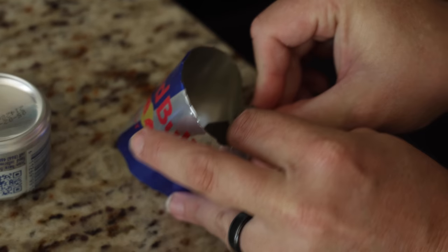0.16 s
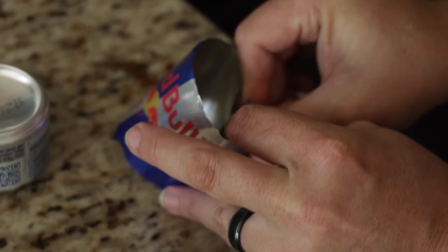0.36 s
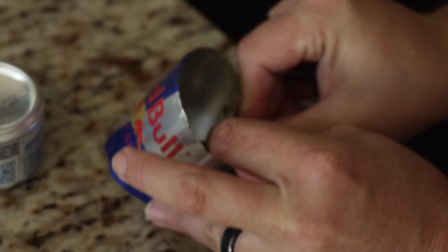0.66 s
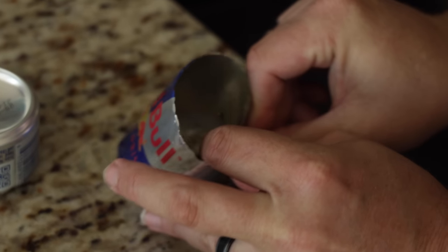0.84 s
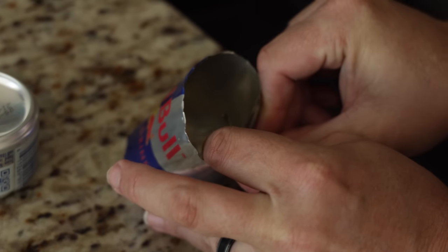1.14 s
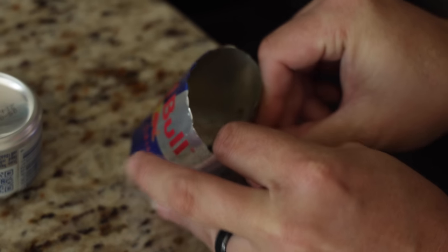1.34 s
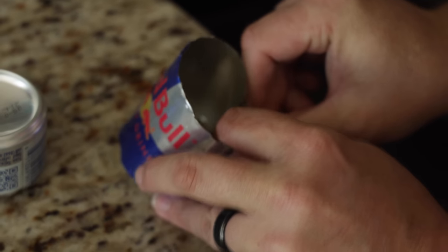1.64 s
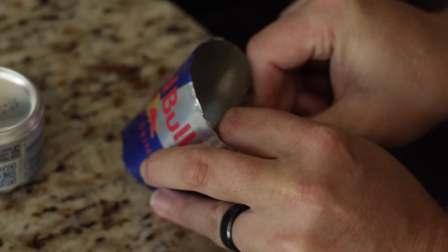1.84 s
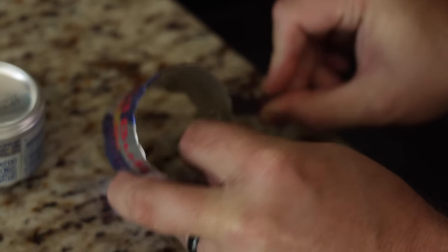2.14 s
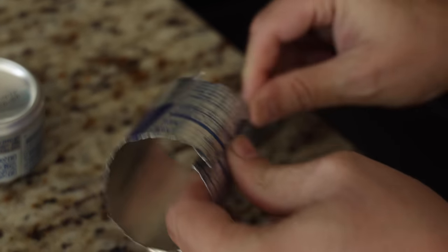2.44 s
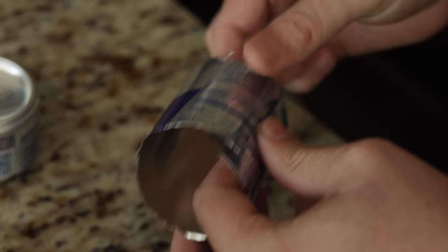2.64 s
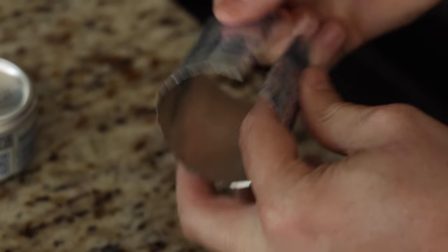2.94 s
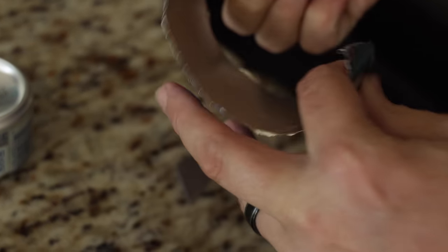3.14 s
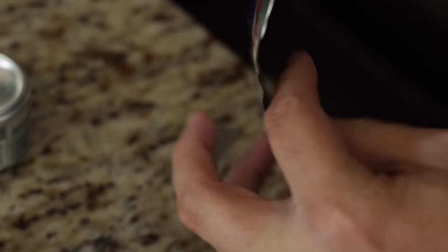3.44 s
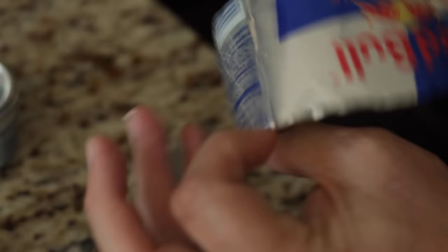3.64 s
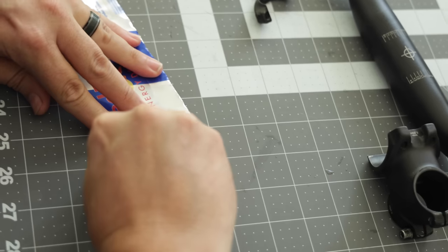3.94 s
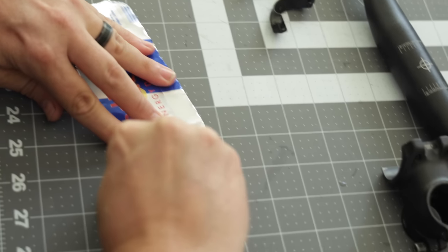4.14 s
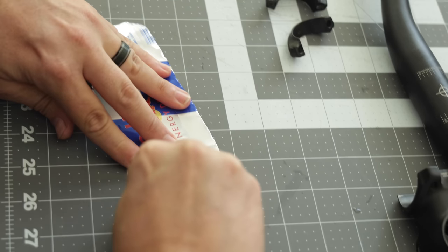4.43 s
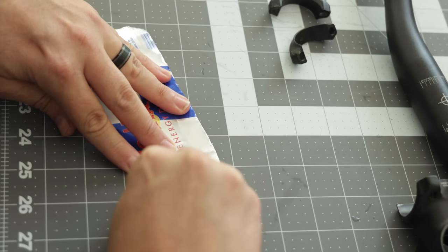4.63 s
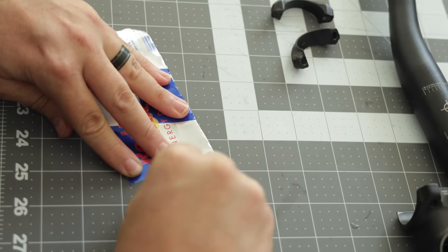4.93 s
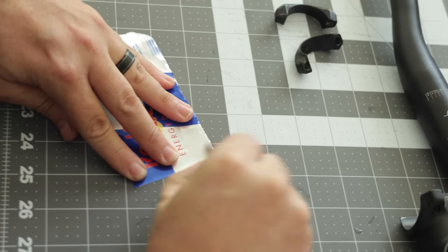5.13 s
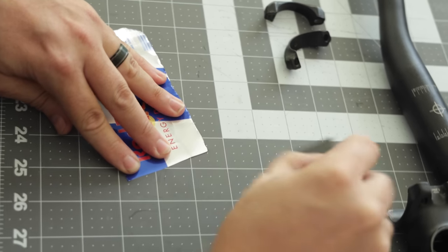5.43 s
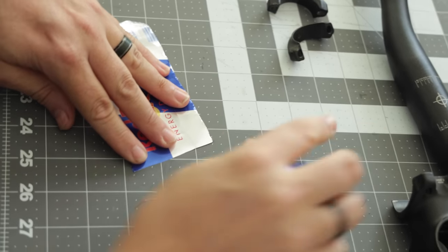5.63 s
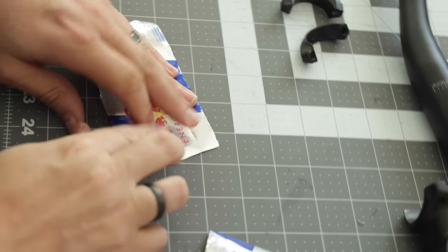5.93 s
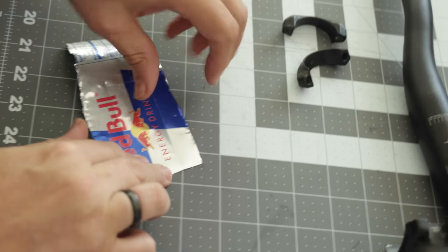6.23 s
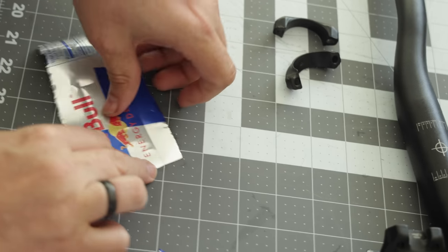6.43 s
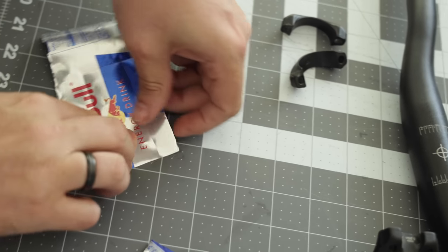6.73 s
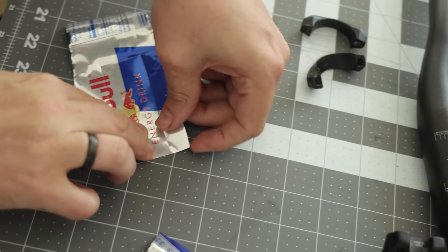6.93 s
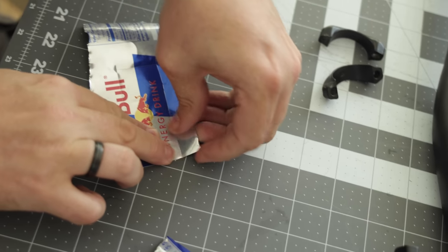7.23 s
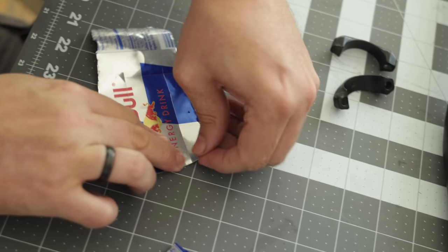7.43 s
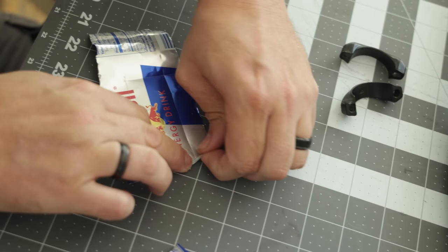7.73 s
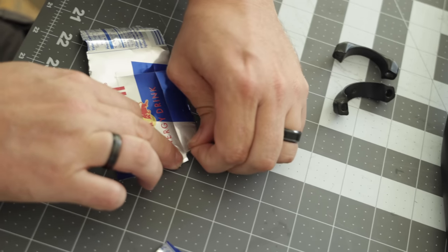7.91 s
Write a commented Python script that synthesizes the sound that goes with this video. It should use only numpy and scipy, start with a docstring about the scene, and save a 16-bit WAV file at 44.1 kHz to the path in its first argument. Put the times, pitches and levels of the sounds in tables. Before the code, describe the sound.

Close metallic snaps and gritty tearing of a drink can, a brief high squeal, then sharp clicks, a singing strip and crinkly pops in a quiet workshop.

```python
"""A razor blade slits a thin aluminium can on a stone counter, over a mains hum: small jerks and
larger snaps set the wall ringing, and the blade squeals on its own resonances as it slides free.
Then, over the softer air noise of a workshop, the flattened sheet is scored on a cutting mat with
ticks and clicks, a strip is dragged away singing and chattering, and the sheet pops and rustles under
the fingers. Hands hiss and brush, soft knocks swing the work surface, and a room tail follows."""
import sys
import numpy as np
from scipy import signal
from scipy.fft import rfft, irfft, next_fast_len
from scipy.io import wavfile

SR = 44100
rng = np.random.default_rng(int(sys.argv[2]) if len(sys.argv) > 2 else 0)


def wav_record(signal):
    """Record a signal, one row per channel, as 16-bit PCM in the file named by sys.argv[1]."""
    frames = np.transpose(np.atleast_2d(signal))
    bounded = np.clip(frames, -1, 1)
    # unit amplitude maps onto the largest positive 16-bit level
    quanta = np.round(bounded * 32767).astype(np.int16)
    wavfile.write(sys.argv[1], SR, quanta)


N = 355887
TIME = np.arange(N) / SR
WORKSHOP_START_S = 3.82
# Left minus right, in dB: the can leans slightly right, the knife on the mat slightly left
CAN_PAN_DB, KNIFE_PAN_DB = -0.4, 1.4

# Edges of the four pitch ranges of a buckle, named body, ring, crack and fizz: f/Hz
REGISTER_EDGES = [680, 1450, 3600, 7500, 15000]
# How each kind of buckle fills those ranges:
# level/dB, gain per dB of brightness/(dB/dB), side level/dB
TEAR_REGISTERS = [(-11.5, -0.4, -10.5), (1, 0, -5.5), (2, 2, -5), (-5, 3.37, -1.5)]
CLICK_REGISTERS = [(-7.5, -0.26, -7), (1.5, -0.17, -3.5), (2, 1.09, 0.5), (-4.5, 1.9, 1.5)]
POP_REGISTERS = [(-17, 0.58, -17), (0, 0.023, -7), (0.5, 1.36, -4.5), (-9.5, 1.86, -3)]

# Hum tones: f/Hz, middle rms level/dB
HUM_TONES = [(120, -42.5), (179.5, -54), (240, -47), (480, -57.5)]
# Shape of the air noise in each place: f/Hz, relative level/dB
COUNTER_AIR = [(20, -23.5), (45, -11), (75, 2.5), (130, 0.5), (260, 0.5), (420, -5.5), (800, -7.5),
               (1600, -16.5), (3500, -22.5), (8000, -45), (16000, -71.5)]
WORKSHOP_AIR = [(20, -12), (45, -11.5), (85, 2.5), (160, -0.5), (300, -1.5), (700, -9), (1500, -11),
                (3500, -33.5), (8000, -35), (16000, -70)]

# The round can snaps as the blade tears it:
# t/s, level/dB, brightness/dB, time to fall 60 dB/s, pitch of the buckling patch f/Hz
CAN_SNAPS = [(0.0215, -20.5, -3, 0.019, 3320), (0.1262, -15.5, -3.5, 0.012, 1600),
             (0.3223, -19, -4.5, 0.02, 1675), (0.7967, -14, -6, 0.045, 1580),
             (0.8095, -13, -1.5, .028, 3180), (0.871, -17.5, -1, 0.037, 3050),
             (1.1329, -21, -3.5, .024, 1770), (1.433, -23.5, -4, 0.036, 1730),
             (1.4662, -27, -4, 0.17, 1740), (1.8388, -15, -2, 0.034, 3140), (1.968, -13, -10, 0.053, 1770),
             (1.976, -12, -1.5, 0.034, 1550), (1.9945, -16, -13, 0.073, 1550),
             (2.0124, -16.5, 2, 0.023, 6000), (2.0185, -10.5, -3.5, 0.025, 2020)]
# The blade jerks forward through the can wall: t/s, level/dB
BLADE_JERKS = [(0.0675, -25.5), (0.106, -24), (0.182, -28.5), (0.2, -23.5), (0.211, -27), (0.2425, -51),
               (0.26, -28.5), (0.294, -39), (0.308, -23), (0.446, -26.5), (0.466, -30), (0.485, -28),
               (0.526, -29), (0.537, -32.5), (0.6035, -52), (0.645, -33.5), (0.7095, -28), (1.002, -25.5),
               (1.19, -30), (1.276, -31.5), (1.336, -38), (1.5765, -29), (1.629, -34.5), (1.666, -39),
               (1.756, -32), (1.9246, -41)]
# Force on the blade in the cut, heard as grinding: t/s, level/dB
BLADE_FORCE = [(0, -40.5), (.15, -38.5), (.32, -31.5), (.38, -41.5), (.77, -42), (.79, -39), (.92, -33),
               (.97, -43.5), (1.1, -36.5), (1.38, -45), (1.49, -37), (1.72, -44.5), (1.95, -38.5),
               (1.985, -19), (2.04, -30), (2.23, -37.5), (2.45, -60.5)]
# The opened can pops as the hands bend it:
# t/s, level/dB, brightness/dB, time to fall 60 dB/s, patch pitch f/Hz
CAN_POPS = [(2.8241, -20.5, -22, 0.0036, 2300), (2.8565, -19.5, -12.5, 0.018, 2080),
            (2.9313, -25, -19, 0.032, 1750), (2.955, -40.5, 1.5, 0.037, 4700),
            (3.3459, -37.5, 1.5, 0.049, 3900), (3.4741, -31.5, -0.5, .025, 4240)]
# Resonances of the can: f/Hz, width/Hz, level/dB
CAN_MODES = [(1146, 260, -5.5), (1418, 550, -2), (1720, 45, 2.5), (2123, 410, -9), (3480, 1700, -7.5),
             (4370, 370, -9.5), (5980, 130, -31)]
# Long-ringing resonances of its open shell: f/Hz, width/Hz, level/dB
SHELL_MODES = [(1330, 6, -3), (1515, 6, -8), (1463, 6, -4.5), (1740, 2.7, -0.5), (1870, 8, -2.5),
               (2010, 6, -2.5), (2070, 7.4, -6)]

# The blade squeals, faintly and then in three surges: start t/s, length/s, level/dB
SQUEALS = [(2.49, 0.11, -48), (2.552, 0.04, -16.5), (2.59, .035, -13.5), (2.626, 0.041, -17.5)]
# The blade catches on the cut edge: t/s, level/dB
CATCHES = [(2.493, -54), (2.596, -20.5), (2.614, -21.5), (2.662, -34.5)]
# Free resonances of the blade: f/Hz, relative level/dB
BLADE_MODES = [(3704, -15), (4748, -21), (7058, -14), (9179, 1), (10465, -3.5), (12290, -2.5),
               (12480, -8.5), (14810, -5.5), (15143, -3.5)]

# Fingers and metal slide: start t/s, length/s, level/dB
SLIDES = [(2.752, .04, -43.5), (3.062, 0.12, -40), (3.678, 0.051, -35), (3.83, 0.028, -40),
          (3.892, 0.02, -35.5), (3.99, 0.078, -40), (4.286, 0.076, -26.5), (4.4, 0.12, -42),
          (5.213, 0.06, -26), (5.383, .13, -33), (7.897, 0.1, -41), (8.02, 0.076, -47.5)]
# Shape of the sliding noise: f/Hz, relative level/dB
SLIDE_COLOUR = [(200, -17), (700, -7), (1600, -0.5), (2600, -4), (4400, -2), (6500, -9.5), (9000, -10),
                (16000, -26.5)]
# The heel of the hand brushes the mat: start t/s, length/s, level/dB
BRUSHES = [(6.44, 0.41, -49), (7.42, 0.042, -47), (7.895, 0.033, -35.5), (7.96, 0.084, -52.5)]
# Shape of the noise of skin on the mat: f/Hz, relative level/dB
PALM_COLOUR = [(60, -35), (250, 2), (700, 3), (1300, -1), (3000, -17.5), (16000, -46)]

# The blade's tip ticks along the score: t/s, level/dB
SCORE_TICKS = [(3.8843, -40.5), (3.895, -46), (3.902, -48), (4.166, -31), (4.2795, -38), (4.426, -41),
               (4.467, -36.5), (4.5982, -42), (4.622, -44), (4.647, -46), (4.671, -41), (4.695, -35.5),
               (4.861, -30), (5.213, -31)]
# The blade clicks through the flat sheet onto the mat:
# t/s, level/dB, brightness/dB, time to fall 60 dB/s, patch pitch f/Hz
SHEET_CLICKS = [(3.9746, -34, -10, .016, 1200), (3.988, -33, -5, .016, 1300),
                (4.1577, -21.5, -3, 0.024, 3360), (4.173, -32.5, 5.5, .025, 4750),
                (4.2879, -21.5, -3.5, .09, 1400), (4.7249, -29.5, -3.5, 0.011, 3350),
                (4.7753, -20, -3, 0.022, 1740), (4.8526, -17.5, -2.5, .011, 3360),
                (4.991, -17, -0.5, 0.024, 3395), (5.1943, -30.5, 3.5, 0.02, 6100),
                (5.229, -22, 3.5, 0.037, 5280), (5.3152, -21, -0.5, 0.023, 4840),
                (5.362, -23.5, -0.5, 0.026, 4620), (5.3795, -11, -4, 0.027, 2590),
                (5.383, -15.5, 4, .024, 4710), (5.392, -23, 2.5, .047, 4300)]
# The flat sheet pops under the fingers:
# t/s, level/dB, brightness/dB, time to fall 60 dB/s, patch pitch f/Hz
SHEET_POPS = [(5.6415, -17.5, 0, 0.22, 3620), (5.6508, -19.5, -4, 0.095, 1363),
              (5.6982, -27, -3, .016, 2500), (5.791, -16, -2.5, 0.11, 2560),
              (6.1078, -30.5, -3, .016, 3270), (6.18, -33, 0, .14, 2950), (6.4101, -31, -13, 0.034, 2660),
              (6.437, -12, -1, 0.051, 2670), (6.4435, -21, 4.5, .037, 5050), (6.664, -32, -4, 0.024, 2570),
              (6.7254, -30.5, -1.5, 0.07, 2730), (6.8321, -31.5, -5.5, 0.07, 2370),
              (7.2415, -16.5, -5, 0.0092, 2960), (7.3459, -34, 1, 0.02, 4430),
              (7.4946, -35, -11, .07, 2820)]
# The flat sheet flexes under the fingers: start t/s, length/s, level/dB
FLEXES = [(6.07, 0.17, -46), (6.43, 0.03, -22.5), (6.548, 0.039, -32.5), (6.72, 0.06, -33.5),
          (6.828, 0.032, -37), (6.925, 0.085, -46.5), (7.23, 0.021, -21.5), (7.492, 0.058, -44.5),
          (7.56, .07, -51.5), (7.718, 0.032, -50.5)]
# Resonances of the knife with the sheet pinned under it: f/Hz, width/Hz, level/dB
KNIFE_MODES = [(1360, 270, 1.5), (2350, 450, -6.5), (3400, 290, 8), (4690, 180, -6.5)]
# Resonances of the flat sheet: f/Hz, width/Hz, level/dB
SHEET_MODES = [(2610, 135, -6), (3040, 120, -3.5), (3620, 780, -1), (4410, 250, -6.5), (4890, 68, -4)]

# The strip's edge chatters on the mat: start t/s, length/s, level/dB
CHATTERS = [(5.655, 0.19, -33.5), (5.82, 0.071, -24), (5.9, 0.064, -27.5)]
# Resonances of that edge: f/Hz, width/Hz, level/dB
CHATTER_MODES = [(1940, 790, -14.5), (3000, 250, -17), (3490, 350, 9)]
# The cut strip sings as it is dragged over the mat: start t/s, length/s, level/dB
DRAGS = [(5.7, 0.099, -30.5), (5.79, 0.034, -21), (5.84, 0.12, -30)]
# Ringing modes of the strip: f/Hz, relative level/dB
STRIP_MODES = [(2000, -14), (2541, -2.5), (2870, -15), (4940, -11.5), (6350, -21)]

# Soft knocks of the hands on the work surface: t/s, level/dB, f/Hz, time to fall 60 dB/s
KNOCKS = [(6.336, -31.5, 82, 0.2), (6.382, -24, 273, 0.036), (6.429, -22, 143, 0.025),
          (6.435, -31, 322, 0.07)]
# Fading of the room tail: f/Hz, time to fall 60 dB/s
ROOM_T60 = [(500, .7), (2000, 0.91), (5000, 0.44), (10000, 0.66), (16000, 0.06)]


def from_db(db):
    """Turn decibels into a plain gain."""
    return 10 ** (np.asarray(db) / 20)


def rms_one(x):
    """Scale a signal to an rms of 1."""
    return x / np.sqrt(np.mean(x ** 2) + 1e-20)


def at_hz(points, hz):
    """Read a table between its rows, with frequency on a logarithmic axis."""
    f, value = np.transpose(points)
    return np.interp(np.log(np.maximum(hz, 1)), np.log(f), value)


def band(low, high):
    """A filter that passes only the range from low to high, in Hz."""
    return signal.butter(2, [low, high], "band", fs=SR, output="sos")


def add(out, s, sound):
    """Mix a sound in at time s."""
    i = max(round(s * SR), 0)
    out[..., i:i + sound.shape[-1]] += sound[..., :N - i]


def spread(x, side_db):
    """Two signals become the middle and the sides of a stereo pair."""
    middle, side = x
    return middle + from_db(side_db) * side * np.array([[1], [-1]])


def panned(x, pan_db):
    """Make left louder than right by pan_db (negative leans right)."""
    return x * from_db(pan_db / 2 * np.array([[1], [-1]]))


def drift(per_s, size=N):
    """Random values with a spread near 1, joined by straight lines, per_s of them each second."""
    return np.interp(TIME[:size] * per_s, np.arange(SR // 10), rng.standard_normal(SR // 10))


def coloured(x, spectrum):
    """Shape a signal by a smooth spectrum, then scale it to an rms of 1."""
    size = next_fast_len(N)
    hz = np.arange(size // 2 + 1) * SR / size
    gain = from_db(at_hz(spectrum, hz))
    return rms_one(irfft(rfft(x, size) * gain, size)[..., :N])


def strokes(rows, attack_s, sag_db, release_s):
    """Gain over time: each stroke rises, sags by sag_db over its length, then falls 60 dB in release_s."""
    out = np.zeros(N)
    for s, length, db in rows:
        t = TIME[:int((length + release_s) * SR)]
        sag = sag_db * np.minimum(t / length, 1)
        release = 60 * np.maximum(t - length, 0) / release_s
        rise = np.minimum(t / attack_s, 1)
        # the listed level is that of the middle of the sag
        add(out, s, rise * from_db(db + sag_db / 2 - sag - release))
    return out


def air(spectrum):
    """Room noise: nearly alike on both sides in the bass, wider in the treble."""
    middle, treble, full = rng.standard_normal((3, N))
    highpass = signal.butter(2, 700, "high", fs=SR, output="sos")
    side = from_db(-6.5) * signal.sosfilt(highpass, treble) + from_db(-15.5) * full
    return coloured(spread([middle, side], side_db=0), spectrum)


def background():
    """An appliance hums in slowly wavering tones by the counter; the workshop has only soft air noise."""
    hum = 0
    for hz, db in HUM_TONES:
        gain = np.sqrt(2) * from_db(db + 0.67 * drift(6.04))
        hum = hum + gain * np.sin(2 * np.pi * (hz * TIME + rng.random()))
    # a 10 ms crossfade from counter to workshop
    at_counter = np.clip((WORKSHOP_START_S - TIME) * 100, 0, 1)
    counter = hum + from_db(-43.0) * air(COUNTER_AIR)
    workshop = from_db(-48.5) * air(WORKSHOP_AIR)
    return at_counter * counter + (1 - at_counter) * workshop


def resonate(x, modes, direct_db):
    """Metal rings at its resonances, over the flat response of the countless weaker ones."""
    out = from_db(direct_db) * x
    for hz, width, db in modes:
        r = np.exp(-np.pi * width / SR)   # a narrower resonance rings longer
        feed = np.array([1, 0, -1]) * (1 - r * r) / 2
        ring = [1, -2 * r * np.cos(2 * np.pi * hz / SR), r * r]
        out = out + from_db(db) * signal.lfilter(feed, ring, x)
    return out


def friction(per_s, size_db, smooth, slip_s=0.00078):
    """Tiny slips of uneven size, each a short dying burst of noise, over a smooth hiss."""
    sizes = from_db(size_db * np.minimum(rng.exponential(1, N), 2))
    slips = (rng.random(N) < per_s / SR) * sizes
    fade = np.exp(-1 / (slip_s * SR))
    grip = rms_one(signal.lfilter([1], [1, -fade], slips + 1e-18))
    return rng.standard_normal((2, N)) * (smooth + grip)


def rubbed(gain, modes, force, direct_db, low_hz, top_hz):
    """Friction keeps the metal's resonances sounding."""
    gentle_band = signal.butter(1, [low_hz, top_hz], "band", fs=SR, output="sos")
    metal = signal.sosfilt(gentle_band, resonate(force, modes, direct_db))
    return gain * rms_one(spread(metal, side_db=-6.5))


def small_snaps(rows, bright_db, t60, patch_hz, scatter):
    """Turn times and levels into buckles of one kind, whose pitch varies by chance."""
    return [(s, db, bright_db, t60, patch_hz * np.exp(scatter * rng.standard_normal())) for s, db in rows]


def snaps(rows, register_law, modes, direct_db, patch_db, patch_cycles, crack, crack_s, rise_s):
    """Each buckle is a sharp crack and a dying flutter of the wall; level and brightness set four registers."""
    out, t = np.zeros((2, N)), TIME[:SR // 8]
    attack = SR // 167   # samples, about 6 ms
    registers = [band(low, high) for low, high in zip(REGISTER_EDGES, REGISTER_EDGES[1:])]
    for s, db, bright_db, t60, patch_hz in rows:
        flutter = from_db(-60 * t / t60)
        force = (flutter + crack * np.exp(-t / crack_s)) * (1 - np.exp(-t / rise_s))
        wall = rms_one(resonate(force * rng.standard_normal((2, len(t))), modes, direct_db))
        # the patch that gives way pings at its own pitch and falls 60 dB in patch_cycles
        phase = 2 * np.pi * patch_hz * t
        ping = np.array([np.sin(phase), np.cos(phase)]) * from_db(-60 * t * patch_hz / patch_cycles)
        wall = wall + from_db(patch_db) * rms_one(ping)
        # levels are those of the attack, so a longer flutter carries more energy
        energy = np.sum(force ** 2) / np.mean(force[:attack] ** 2)
        for sos, (register_db, follows, side_db) in zip(registers, register_law):
            part = signal.sosfilt(sos, wall)
            part = part * np.sqrt(energy / np.sum(part ** 2, axis=1, keepdims=True))
            add(out, s, from_db(db + register_db + follows * bright_db) * spread(part, side_db))
    return out


def can_wall():
    """The blade tears the round wall in small jerks between larger snaps; the open shell rings on and pops."""
    tearing = friction(per_s=180, size_db=3, smooth=.2, slip_s=.0025)
    force = from_db(np.interp(TIME, *np.transpose(BLADE_FORCE)))
    grinding = rubbed(force, CAN_MODES, tearing, direct_db=-20.5, low_hz=695, top_hz=4000)
    jerks = small_snaps(BLADE_JERKS, bright_db=-6, t60=.03, patch_hz=1660, scatter=0.08)
    tears = snaps(CAN_SNAPS + jerks, TEAR_REGISTERS, CAN_MODES, direct_db=-8, patch_db=-6,
                  patch_cycles=45, crack=0.57, crack_s=0.00034, rise_s=0.0012)
    pops = snaps(CAN_POPS, POP_REGISTERS, CAN_MODES, direct_db=7, patch_db=-2.5,
                 patch_cycles=35, crack=0.6, crack_s=0.0002, rise_s=0.00013)
    shell = resonate(grinding + tears, SHELL_MODES, direct_db=0)
    return panned(shell + pops, CAN_PAN_DB)


def singing(start_s, modes, waver_db, jitter_hz):
    """Stick and slip keeps a thin plate's modes sounding for half a second, wavering in strength and pitch."""
    out, tone, size = np.zeros((2, N)), 0, SR // 2
    for hz, db in modes:
        phase = 2 * np.pi * np.cumsum(hz + jitter_hz * drift(300, size)) / SR
        # the phase drifts by chance, separately on each side, which widens the tone
        side_phase = np.array([drift(15, size), drift(28.5, size)]) * .7
        tone = tone + from_db(db + waver_db * drift(46.4, size)) * np.sin(phase + side_phase)
    add(out, start_s, rms_one(tone))
    return out


def blade(catch_t60=0.016):
    """Stick and slip makes the blade squeal with a little hiss; catches add short noise ticks."""
    gain = strokes(SQUEALS, attack_s=0.0095, sag_db=0.0, release_s=.02)
    squeal = singing(SQUEALS[0][0], BLADE_MODES, waver_db=4.5, jitter_hz=22)
    hiss = from_db(-18) * rng.standard_normal((2, N))
    out = gain * (squeal + hiss)
    t = TIME[:SR // 10]
    for s, db in CATCHES:
        noise = spread(rng.standard_normal((2, len(t))), side_db=2.0)
        tick = signal.sosfilt(band(2000, 15000), noise)
        add(out, s, tick * from_db(db - 60 * t / catch_t60))
    return out


def first_touch(db, t60):
    """The first catch leaves the blade's two lowest modes ringing freely; db is the level of the lowest."""
    t = np.maximum(TIME - CATCHES[0][0], 0)
    out = 0
    for hz, mode_db in BLADE_MODES[:2]:
        fading = from_db(db + mode_db - BLADE_MODES[0][1] - 60 * t / t60)
        out = out + fading * np.sin(2 * np.pi * hz * t)
    return out


def hands():
    """Fingers and metal slide with a grainy hiss; the heel of the hand brushes the mat dully."""
    grain = spread(friction(per_s=460, size_db=1.0, smooth=3.4), side_db=-5)
    slide = strokes(SLIDES, attack_s=0.012, sag_db=12, release_s=0.21) * coloured(grain, SLIDE_COLOUR)
    skin = spread(rng.standard_normal((2, N)), side_db=-11.0)
    palm = strokes(BRUSHES, attack_s=.012, sag_db=2, release_s=0.16) * coloured(skin, PALM_COLOUR)
    return slide, palm


def flat_sheet():
    """The flattened sheet clicks as it buckles under the blade, and pops and crinkles under the fingers."""
    crinkles = friction(per_s=240, size_db=3, smooth=.3, slip_s=.003)
    flexing = strokes(FLEXES, attack_s=0.0094, sag_db=5.5, release_s=0.055)
    rustle = rubbed(flexing, SHEET_MODES, crinkles, direct_db=-14, low_hz=805, top_hz=3300)
    ticks = small_snaps(SCORE_TICKS, bright_db=2.5, t60=0.015, patch_hz=3650, scatter=.1)
    clicks = snaps(SHEET_CLICKS + ticks, CLICK_REGISTERS, KNIFE_MODES, direct_db=-6, patch_db=-4,
                   patch_cycles=49, crack=0.85, crack_s=0.00086, rise_s=0.00037)
    pops = snaps(SHEET_POPS, POP_REGISTERS, SHEET_MODES, direct_db=-7, patch_db=-3,
                 patch_cycles=54, crack=0.64, crack_s=0.0004, rise_s=0.00044)
    return rustle + panned(clicks, KNIFE_PAN_DB) + pops


def cut_strip():
    """The loose strip rings by stick and slip, and its edge chatters in many tiny slips."""
    rattle = friction(per_s=350, size_db=2.5, smooth=.6, slip_s=.002)
    contact = strokes(CHATTERS, attack_s=0.01, sag_db=4.0, release_s=0.13)
    chatter = rubbed(contact, CHATTER_MODES, rattle, direct_db=-6, low_hz=1170, top_hz=8040)
    drag = strokes(DRAGS, attack_s=0.0034, sag_db=2, release_s=0.085)
    return chatter + drag * singing(DRAGS[0][0], STRIP_MODES, waver_db=6.0, jitter_hz=15)


def knocks():
    """A soft push sets the work surface swinging, and the swing dies away."""
    out, t = np.zeros(N), TIME[:SR // 4]
    for s, db, hz, t60 in KNOCKS:
        add(out, s, from_db(db - 60 * t / t60) * np.sin(2 * np.pi * hz * t))
    return out


def room(x, build_s=0.0009):
    """Many blurred reflections build up quickly, then fade at a different rate in each band."""
    t, edges = TIME[:SR], np.geomspace(150, 17000, 9)
    tail = 0
    for low, high in zip(edges, edges[1:]):
        noise = signal.sosfilt(band(low, high), spread(rng.standard_normal((2, SR)), side_db=0))
        t60 = at_hz(ROOM_T60, np.sqrt(low * high))
        tail = tail + noise * from_db(-60 * t / t60)
    tail = rms_one(tail * (1 - np.exp(-t / build_s))) / np.sqrt(SR)   # energy 1
    return signal.fftconvolve(x, tail, axes=1)[:, :N]


def scene():
    """All sources sound close by, over the background; all but palm and knocks also feed the room tail."""
    can, sheet, strip = can_wall(), flat_sheet(), cut_strip()
    squeal = blade() + first_touch(db=-42.0, t60=0.44)
    slide, palm = hands()
    metal_send = from_db(-9.5) * can + from_db(-7.5) * sheet + from_db(-14.5) * strip
    wet = room(metal_send + from_db(-9.0) * slide + from_db(-13) * squeal)
    close = can + sheet + strip + slide + palm + squeal + knocks()
    return close + wet + background()


def record(dry, microphone_hz=13500, cutoff_hz=15850):
    """The microphone softens the high treble, peaks past full scale are clipped, and the top is cut."""
    soften = signal.butter(2, microphone_hz, fs=SR, output="sos")
    heard = np.clip(signal.sosfilt(soften, dry), -1, 1)
    steep_cut = signal.ellip(10, .1, 80, cutoff_hz, fs=SR, output="sos")
    return signal.sosfilt(steep_cut, heard)


dry = scene()
out = record(dry)
wav_record(out)
```